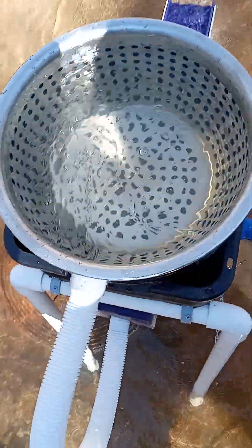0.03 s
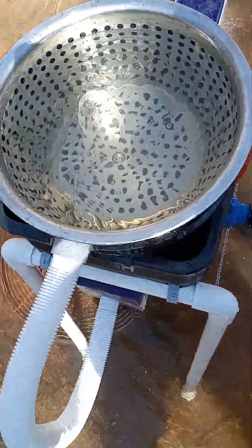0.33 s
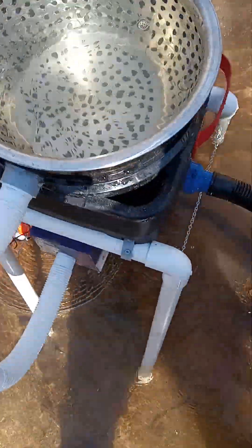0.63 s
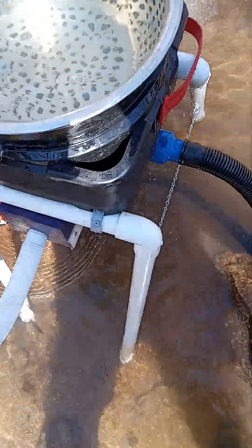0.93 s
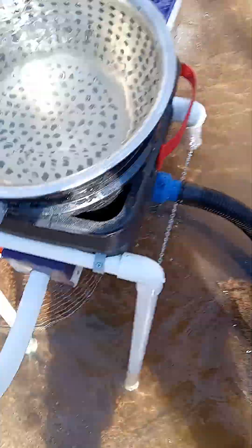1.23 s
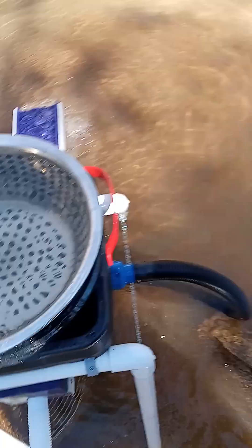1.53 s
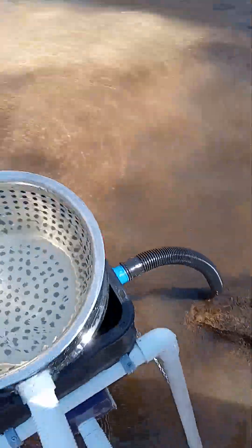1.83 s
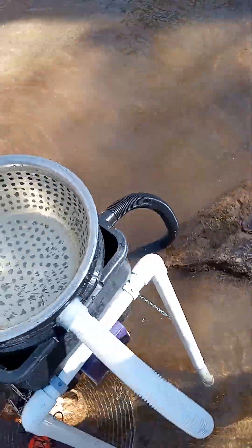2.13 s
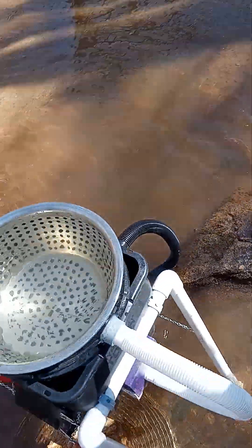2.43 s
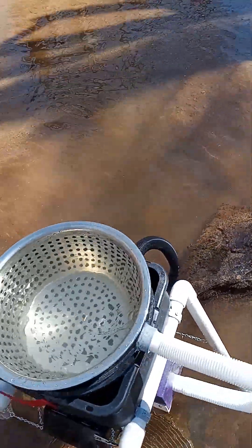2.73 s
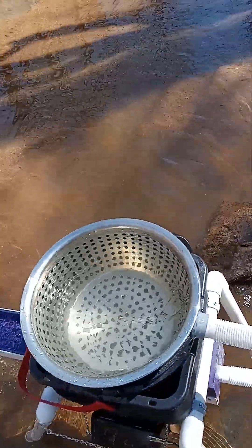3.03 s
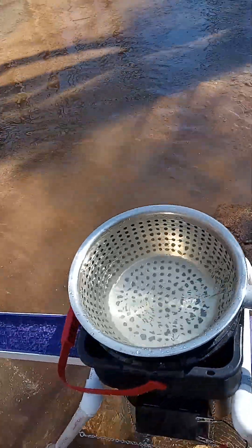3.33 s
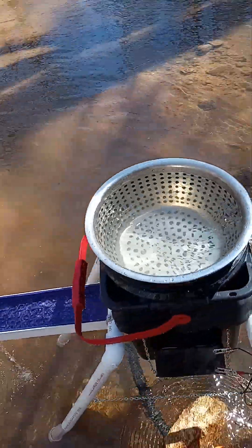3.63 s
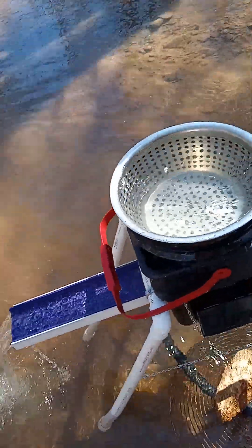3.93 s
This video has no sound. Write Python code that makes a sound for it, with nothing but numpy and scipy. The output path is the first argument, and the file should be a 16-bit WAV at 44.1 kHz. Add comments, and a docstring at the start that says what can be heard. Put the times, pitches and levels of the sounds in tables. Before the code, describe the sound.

Water trickles and patters through a small sluice in a shallow stream, over a faint low rumble. About halfway through, it starts sloshing in repeated surges, with spray, gulps and plinking bubbles, close to the microphone.

```python
"""Water at a small sluice in a stream

Water trickles and patters through a small sluice rig in a shallow stream, over a low rumble from
its hoses and tub. From about two seconds on, the water beside it sloshes in several surges, as if
someone wades round the rig: spray falls back, foam fizzes, air pockets gulp and small bubbles plink.
The microphone is close, with its right side facing the water."""
import sys
import numpy as np
from scipy import signal
from scipy.fft import rfft, irfft, next_fast_len
from scipy.io import wavfile

SR = 44100
rng = np.random.default_rng(int(sys.argv[2]) if len(sys.argv) > 2 else 0)


def transcribe(signal):
    """Save signal, clipped to [-1, 1], as a 16-bit WAV file at the path in sys.argv[1]."""
    frames = np.atleast_2d(signal).T
    limited = np.clip(frames, -1, 1)
    pcm = np.round(limited * 32767).astype(np.int16)
    wavfile.write(sys.argv[1], SR, pcm)


N = 176400  # 4 seconds


def amp(db):
    """Turns decibels into a number to multiply by."""
    return 10 ** (np.asarray(db) / 20)


def unit(x):
    """Scales a signal to an average (rms) level of 1."""
    return x / np.sqrt(np.mean(x ** 2) + 1e-20)


def read(points, hz):
    """Looks up values between the rows of a table, on a log-frequency scale."""
    freqs, values = np.transpose(points)
    return np.interp(np.log(hz + 1), np.log(freqs + 1), values)


def colour(x, spectrum):
    """Shapes the tone of a sound; white noise would keep its power."""
    gain = amp(read(spectrum, np.fft.rfftfreq(N, 1 / SR)))
    return irfft(rfft(x) * unit(gain), N)


def drift(rate_hz, size):
    """A smooth random wiggle with little movement faster than rate_hz."""
    noise = rfft(rng.standard_normal(size))
    return unit(irfft(noise / (1 + (np.fft.rfftfreq(size, 1 / SR) / rate_hz) ** 4), size))


def add(mix, start_s, sound):
    """Mixes a sound in at a given time, cutting off what does not fit."""
    at = round(start_s * SR)
    part = mix[..., max(at, 0):][..., :max(sound.shape[-1] + min(at, 0), 0)]
    part += sound[..., max(-at, 0):][..., :part.shape[-1]]


def tiny_rings(rate, low_hz, high_hz, cycles, spread_db, glide, bands=36):
    """A stereo cloud of tiny rings: long ones sound like bubbles, very short ones like clicks."""
    pan_db, delay_s = 2.5, 0.00008  # drops land all over the rig
    out = np.zeros((2, N))
    edges = np.geomspace(low_hz, high_hz, bands + 1)
    shares = np.diff(np.sqrt(edges)) / (np.sqrt(high_hz) - np.sqrt(low_hz))
    for low, high, share in zip(edges, edges[1:], shares):
        count = int(np.clip(rate * share * N / SR, 2, 2048))  # rate is per second, capped in each band
        when, pitch, big, rise = rng.random((2048, 4))[:count].T[:, :, None]
        pan, lag = rng.standard_normal((2048, 2))[:count].T[:, :, None]
        hz = low + (high - low) * pitch
        age = np.arange(int(2 * cycles * SR / low) + 2) / SR
        life = age * hz / cycles
        size = amp(spread_db * np.minimum(-np.log(1 - big), np.pi + 1))
        envelope = size * life * np.exp(-2 * np.pi * life * np.log(2))
        ring = envelope * np.sin(2 * np.pi * cycles * life * (1 + glide * rise * life))
        ring *= np.sqrt((high - low) / np.sum(ring ** 2))  # same power per Hz in every band
        right_at = (when * N).astype(int) + np.arange(len(age))
        left_at = right_at + np.round(lag * delay_s * SR).astype(int)
        out[0] += np.bincount(left_at.ravel() % N, (ring * amp(pan_db * pan)).ravel(), N)
        out[1] += np.bincount(right_at.ravel() % N, ring.ravel(), N)
    return out / np.sqrt(np.mean(out ** 2, 1, keepdims=True))


def swarms(x, depth_db, width_hz=140, length_s=0.019):
    """Bubbles of similar size come in swarms, so patches of pitch swell and fade."""
    hz, t, spectra = signal.stft(x, SR, nperseg=512, noverlap=384)
    noise = np.fft.rfft2(rng.standard_normal(spectra.shape[1:]))
    across_pitch = np.fft.fftfreq(len(hz), hz[1])[:, None]
    along_time = np.fft.rfftfreq(len(t), t[1])
    blur = np.exp(-(across_pitch * width_hz) ** 2 - (along_time * length_s) ** 2)
    patches = unit(np.fft.irfft2(noise * blur, spectra.shape[1:]))
    gain = amp(depth_db * 2 * np.tanh(patches / 2))
    return signal.istft(spectra * gain, SR, nperseg=512, noverlap=384)[1][:, :N]


def water(tone, rings, crackle_rate, crackle_db, crackle_spread_db,
          hiss_db, clump_db, clump_hz, swarm_db):
    """Ringing bubbles, the crackle of landing drops and fine hiss, arriving in clumps and swarms."""
    crackle = tiny_rings(crackle_rate, 700, 15500, cycles=2, spread_db=crackle_spread_db,
                         glide=0, bands=12)
    mix = rings + amp(crackle_db) * crackle + amp(hiss_db) * rng.standard_normal((2, N))
    mix = swarms(mix, swarm_db)
    clumps = amp(clump_db * drift(clump_hz, N))
    return unit(colour(mix * clumps, tone))


# Tone of the low drone (frequency [Hz], relative level [dB])
RUMBLE_TONE = [(20, -55), (38, -38), (55, -9.5), (70, 4), (95, -2.5), (140, 0), (250, -10), (600, -31),
               (3000, -54)]

def rumble(level_db=-60.5, stereo_width=0.065, swell_db=4.5, swell_hz=9):
    """Water moving through the hoses and tub makes a low, uneven drone."""
    noise = rng.standard_normal(N) + stereo_width * rng.standard_normal((2, N))
    swell = amp(swell_db * drift(swell_hz, N))
    return amp(level_db) * unit(colour(noise, RUMBLE_TONE) * swell)


# Tones of the pattering water and its low gurgle (frequency [Hz], relative level [dB])
TRICKLE_TONE = [(120, -10.5), (550, -4), (1050, -2.5), (1600, 4.5), (2100, 4), (2400, 5.5), (2900, -4.5),
                (4000, 1), (5000, -9.5), (6300, -8.5), (8000, -13), (11000, -13.5), (15500, -17)]
GURGLE_TONE = [(200, -4), (350, -8), (600, 2.5), (850, 0.5), (1300, -13)]

def trickle(patter_db=-45.5, gurgle_db=-57, drips_db=-55.5):
    """Water runs steadily off the sluice: patter, a low gurgle and single ringing drips."""
    rings = tiny_rings(rate=1800, low_hz=252.8, high_hz=9000, cycles=25.8, spread_db=2.5, glide=0.017)
    patter = water(TRICKLE_TONE, rings, crackle_rate=1500, crackle_db=-0.5, crackle_spread_db=4.0,
                   hiss_db=-0.5, clump_db=2.18, clump_hz=35.3, swarm_db=2.5)
    gurgle = tiny_rings(82, 254.4, 1357, cycles=15.3, spread_db=3.8, glide=0.11, bands=8)
    drips = tiny_rings(70, 2996, 6604, cycles=63, spread_db=2.5, glide=0.016, bands=8)
    return (amp(patter_db) * patter
            + amp(gurgle_db) * unit(colour(gurgle, GURGLE_TONE))
            + amp(drips_db) * unit(colour(drips, TRICKLE_TONE)))


def foam(gain_db=-18.5, fade_s=1):
    """Foam left by the spray keeps fizzing finely and dies away slowly."""
    keep = np.exp(-1 / (fade_s * SR))
    lingering_power = signal.lfilter([1 - keep], [1, -keep], surge("spray") ** 2)
    fizz = tiny_rings(1800, 6060, 15800, cycles=24, spread_db=5, glide=0, bands=8)
    return amp(gain_db) * np.sqrt(lingering_power) * fizz


# Hollow glugs (start [s], length [s], level [dB], starting pitch [Hz], slide [octaves])
HOLLOW_GLUGS = [(.02, 0.088, -46.5, 524, 0.41), (1.268, 0.018, -46.5, 688, -0.045),
                (2.353, 0.1, -40, 390, -0.0056), (2.42, 0.031, -39, 905, -0.14),
                (2.583, 0.042, -41.5, 770, -0.022), (2.957, .13, -45, 445.3, -0.185),
                (3.92, 0.12, -45.5, 510.5, 0.21)]

def glugs(flutter_hz=71):
    """Churning water keeps a hollow ringing unevenly while its pitch slides."""
    out = np.zeros(N)
    for start, length, db, hz, slide in HOLLOW_GLUGS:
        t = np.arange(int(length * SR)) / SR
        flutter = (drift(flutter_hz, SR) + 1j * drift(flutter_hz, SR))[:len(t)]
        pitch = hz * 2 ** (slide * t / length)
        ring = (flutter * np.exp(2j * np.pi * np.cumsum(pitch) / SR)).real
        add(out, start, amp(db) * unit(ring * signal.windows.tukey(len(t), 0.5)))
    return np.array([out, out])


def bubble(hz, db, ring_s, glide, wobble, sharpness=3.08):
    """An air pocket rings and glides in pitch as it nears the surface; returns peak time and sound."""
    t = np.arange(int(4 * ring_s * SR)) / SR
    peak_s = ring_s * np.sqrt(sharpness) / np.e
    swell = (t / peak_s * np.exp(1 - t / peak_s)) ** sharpness
    wander = wobble * np.resize(drift(hz / 6, 8192), len(t))
    pitch = hz * 2 ** (glide * np.tanh((t - peak_s) / ring_s)) * (1 + wander)
    return peak_s, amp(db) * swell * np.sin(2 * np.pi * np.cumsum(pitch) / SR)


# Big air pockets (peak time [s], pitch [Hz], level [dB], ring time [s], glide [octaves each side of the peak])
AIR_GULPS = [(0.593, 595, -39, 0.0154, 0.27), (.635, 148, -47, .035, -0.86),
             (1.263, 344, -24, 0.0094, -0.11), (2.24, 892, -27.5, 0.013, -0.26),
             (2.306, 429, -32, 0.022, -0.16), (2.375, 726, -33, 0.032, 0.19),
             (2.503, 738, -22.5, 0.016, 0.62), (2.774, 204, -41.5, 0.013, -0.3),
             (2.843, 138, -43, 0.026, -0.13), (2.984, 421, -31.5, 0.014, -0.14),
             (3.01, 391, -35.5, 0.0115, -0.072), (3.031, 366, -27, 0.0083, 0.07),
             (3.394, 263, -30.5, 0.0088, 0.28), (3.426, 358, -26, 0.006, -0.23),
             (3.7, 146, -46.5, 0.011, -0.25), (3.833, 521, -38, .013, -0.042),
             (3.89, 421, -24, 0.011, -0.1)]
# Small bubbles trapped by drips (peak time [s], pitch [Hz], level [dB])
DRIP_PLINKS = [(0.139, 2206, -27.5), (.316, 2370, -33), (0.524, 2430, -33), (0.655, 2930, -33),
               (0.969, 2520, -26.5), (1.27, 5040, -31.5), (1.386, 2411, -34), (1.492, 2400, -33),
               (1.6, 2200, -30), (1.676, 4370, -37), (2.091, 2130, -33), (2.216, 3250, -33),
               (2.262, 1796, -20.5), (2.628, 2180, -28), (2.652, 2630, -26.5), (2.796, 3910, -28),
               (2.811, 2170, -25), (2.891, 3010, -25.5), (2.905, 2040, -35), (2.925, 1353, -25.5),
               (3.198, 1365, -31), (3.488, 2130, -20), (3.552, 2850, -25.5), (3.637, 1550, -29.5),
               (3.939, 2640, -25)]

def bubbles():
    """Big air pockets gulp, and each falling drip traps a small bubble that plinks."""
    out = np.zeros(N)
    for time, hz, db, ring_s, glide in AIR_GULPS:
        peak_s, gulp = bubble(hz, db, ring_s, glide, wobble=0.077)
        add(out, time - peak_s, gulp)
    for time, hz, db in DRIP_PLINKS:
        peak_s, plink = bubble(hz, db, ring_s=0.0055, glide=0.12, wobble=0.067)
        add(out, time - peak_s, plink)
    return np.array([out, out])


# Big drops hitting the water (time [s], relative level [dB])
BIG_DROPS = [(2.446, -18.5), (2.47, -17.5), (2.636, -16.5), (3.196, -34), (3.309, -16.5), (3.358, -21),
             (3.423, -17), (3.676, -21), (3.72, -20.5)]
# Tone of their spatter (frequency [Hz], relative level [dB])
SMACK_TONE = [(500, -18), (2000, -18), (4000, 11.5), (6500, 10.5), (9000, 2.5), (15500, -10.5)]

def smacks(decay_s=0.0035):
    """Big drops land with a short, bright spatter."""
    out = np.zeros((2, N))
    age = np.arange(1024) / SR / decay_s
    envelope = np.sqrt(2 * age) * np.exp(-age) / 2
    for time, db in BIG_DROPS:
        add(out, time - decay_s / 2, amp(db) * envelope * rng.standard_normal((2, len(age))))
    return colour(out, SMACK_TONE)


# Surges of water (start [s], length [s], splash level [dB], spray level [dB], churn level [dB])
SURGES = [(0.0, 0.13, -44.5, -69, -92), (0.423, 0.038, -42, -47.5, -55.5), (0.944, 0.021, -41.5, -58, -55),
          (1.254, 0.019, -43, -43, -50), (1.368, 0.029, -47, -44.5, -53), (1.75, 0.42, -50.5, -62, -52),
          (2.202, 0.091, -39, -44.5, -49.5), (2.327, 0.12, -45, -41.5, -49), (2.372, 0.12, -36.5, -38, -42),
          (2.483, 0.074, -45, -38.5, -43), (2.546, 0.1, -37, -33.5, -42), (2.654, 0.076, -42, -39.5, -49.5),
          (2.73, 0.15, -40, -40, -53), (2.88, 0.053, -36, -42, -47), (2.96, 0.11, -55, -47, -46),
          (3.089, 0.1, -41, -47, -53), (3.185, 0.033, -35.5, -39, -54), (3.227, .125, -36.5, -37.5, -52.5),
          (3.353, 0.12, -38.5, -40, -49), (3.475, 0.085, -55, -36, -64), (3.573, 0.21, -46.5, -46, -60),
          (3.757, 0.31, -51.5, -60, -51), (3.856, 0.079, -40, -50.5, -47), (3.906, 0.11, -48, -42, -71)]

def surge(layer, rise_s=0.011, fall_s=0.0034):
    """How loud one layer is over time: each surge rises quickly, holds, then drops away."""
    column = ("splash", "spray", "churn").index(layer)
    t, power = np.arange(N) / SR, np.zeros(N)
    for start, length, *levels in SURGES:
        rise = np.clip((t - start) / rise_s, 0, 1)
        fall = np.exp(-np.maximum(t - start - length, 0) / fall_s)
        power += (amp(levels[column]) * rise * fall) ** 2
    return np.sqrt(power)


# Tones of the splash, bright spray and deep churn (frequency [Hz], relative level [dB])
SPLASH_TONE = [(400, -78), (900, -17.5), (1350, 6), (1800, 3), (2300, 3), (3000, -1), (4500, -15.5),
               (8000, -43), (15500, -30)]
SPRAY_TONE = [(800, -52), (2000, 6), (3100, 7.5), (4200, 8.5), (5500, 8.5), (6600, 2), (8500, -2.5),
              (12000, -9.5), (15500, -6.5)]
CHURN_TONE = [(70, -41), (220, -4), (390, 1.5), (560, -2), (780, -3), (1100, -2), (2000, -7.5)]

def sloshes():
    """Each surge throws a splash and fine spray, and churns bigger bubbles under the surface."""
    rings = tiny_rings(rate=2200, low_hz=599, high_hz=7055, cycles=15.8, spread_db=3.0, glide=0.088)
    splash = water(SPLASH_TONE, rings, crackle_rate=7400, crackle_db=-5, crackle_spread_db=0.5,
                   hiss_db=-5.5, clump_db=1.5, clump_hz=54, swarm_db=5.0)
    rings = tiny_rings(rate=3300, low_hz=1504, high_hz=11660, cycles=14.5, spread_db=4.5, glide=0.056)
    spray = water(SPRAY_TONE, rings, crackle_rate=4100, crackle_db=-3.5, crackle_spread_db=1.0,
                  hiss_db=-4.5, clump_db=-1.5, clump_hz=68.6, swarm_db=5.5)
    rings = tiny_rings(1200, 162.3, 1760, cycles=7.7, spread_db=0.5, glide=0.067, bands=14)
    churn = unit(colour(rings, CHURN_TONE))
    return splash * surge("splash") + spray * surge("spray") + churn * surge("churn")


def rig_echo(x, gain_db=-6.5, tail_s=0.17, low_cut_hz=700, shifts_per_s=2.299, patterns=3):
    """Short echoes off the tub and sieve; their pattern shifts as the water and microphone move."""
    t, out = np.arange(4096) / SR, np.zeros((2, N))
    low_cut = signal.butter(1, low_cut_hz, "high", fs=SR, output="sos")
    for k in range(patterns):
        echoes = rng.standard_normal((2, len(t))) * amp(-60 * t / tail_s) * (t > 0.001)
        echoes = signal.sosfilt(low_cut, echoes)
        echoes /= np.linalg.norm(echoes, axis=1, keepdims=True)
        blend = np.cos(np.pi * (shifts_per_s * np.arange(N) / SR + k / patterns)) * np.sqrt(2 / patterns)
        out += signal.oaconvolve(x * blend, echoes, axes=1)[:, :N]
    return amp(gain_db) * out


def scene():
    """All the water, heard from beside the rig."""
    near = trickle() + sloshes() + foam() + bubbles() + glugs() + smacks()
    return near + rig_echo(near) + rumble()


# Tone of the microphone, and the muffling of its left side (frequency [Hz], gain [dB])
MIC_TONE = [(20, 0), (6600, -2.5), (7400, -6.5), (8200, -14), (10000, -4.5), (12000, -2.5), (13800, -11),
            (14500, 2.5), (15300, 8), (16000, -44)]
LEFT_SHADE = [(60, -0.5), (150, -1.5), (350, -2), (650, -0.5), (1200, -4.5), (2200, -9.5), (3500, -10.5),
              (5500, -13), (7500, -5.5), (10000, -12.5), (15000, -11)]
# How much later sound reaches the left side (frequency [Hz], delay [ms])
LEFT_DELAY = [(100, 0.27), (700, 0.22), (1400, 0.25), (2600, 0.53), (8000, 0.526)]

def record(dry, cutoff_hz=15700):
    """The microphone colours the sound and cuts the top treble; its left side is duller and later."""
    size = next_fast_len(N + 2048)
    hz = np.fft.rfftfreq(size, 1 / SR)
    spectrum = rfft(dry, size) * amp(read(MIC_TONE, hz))
    delay_s = read(LEFT_DELAY, hz) / 1000
    spectrum[0] *= amp(read(LEFT_SHADE, hz)) * np.exp(-2j * np.pi * hz * delay_s)
    treble_cut = signal.firwin(801, cutoff_hz, window=("kaiser", 9), fs=SR)
    return signal.oaconvolve(irfft(spectrum, size)[:, :N], treble_cut[None], "same")


dry = scene()
out = record(dry)
transcribe(out)
```